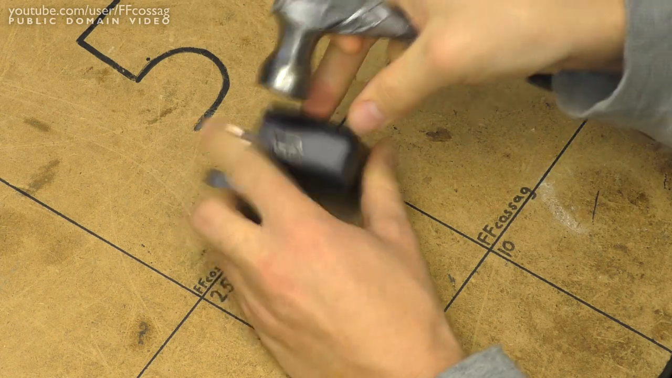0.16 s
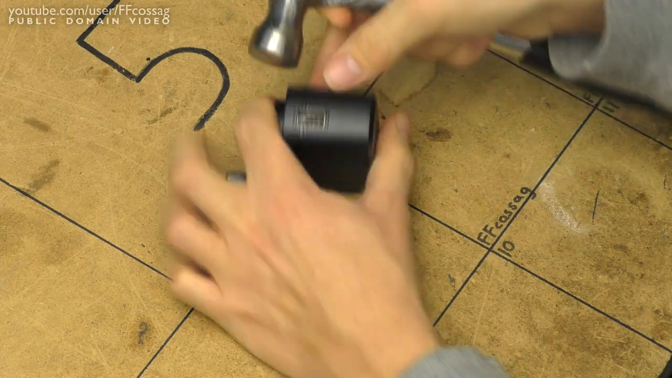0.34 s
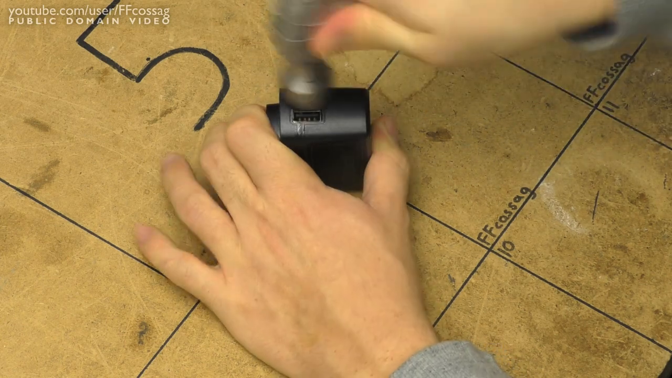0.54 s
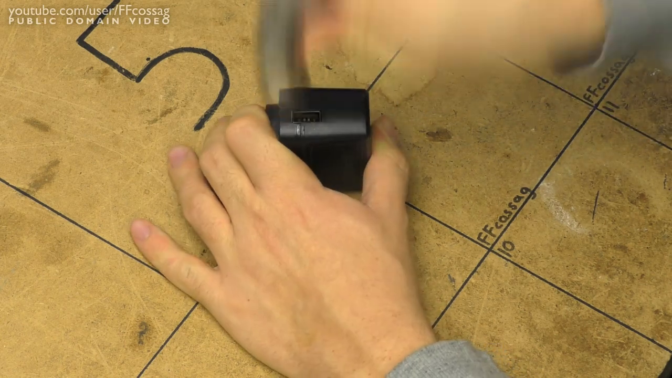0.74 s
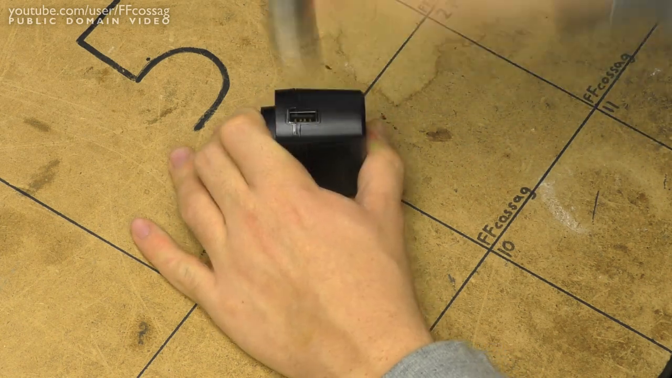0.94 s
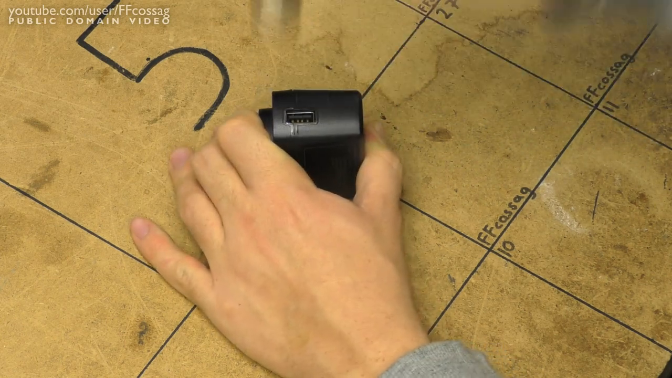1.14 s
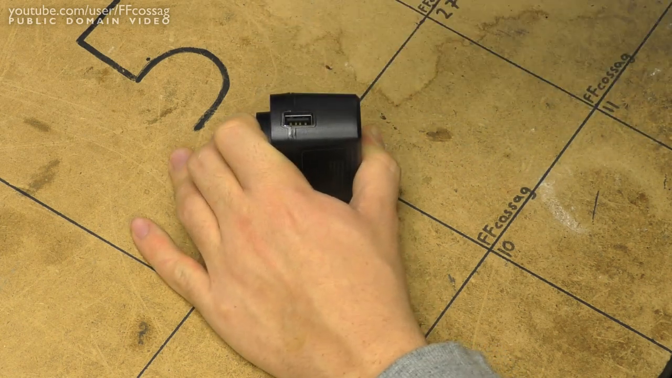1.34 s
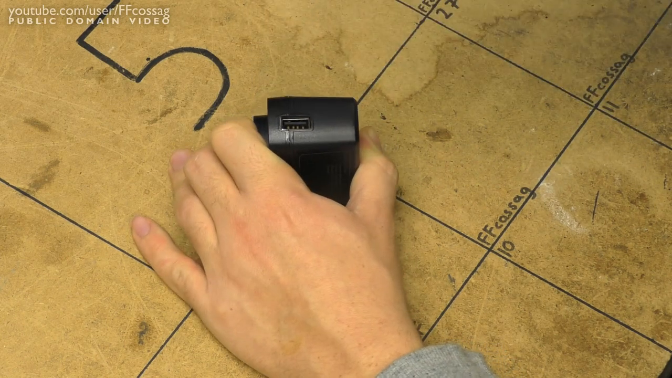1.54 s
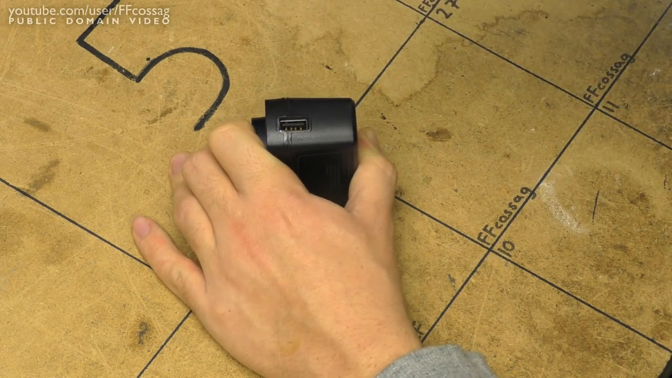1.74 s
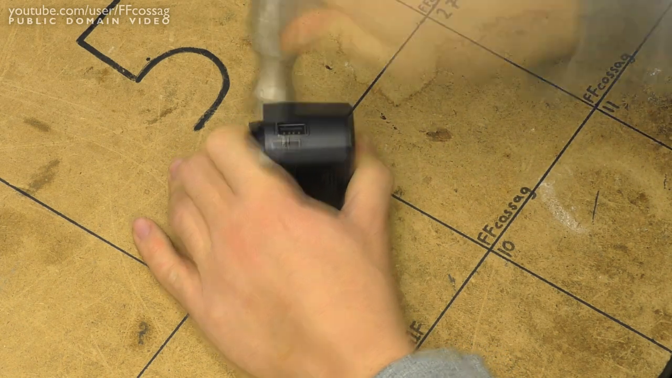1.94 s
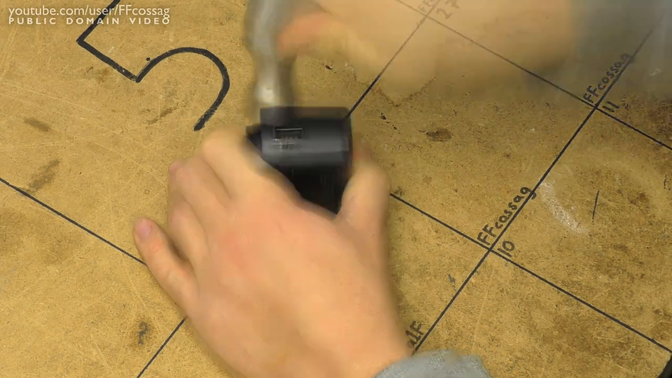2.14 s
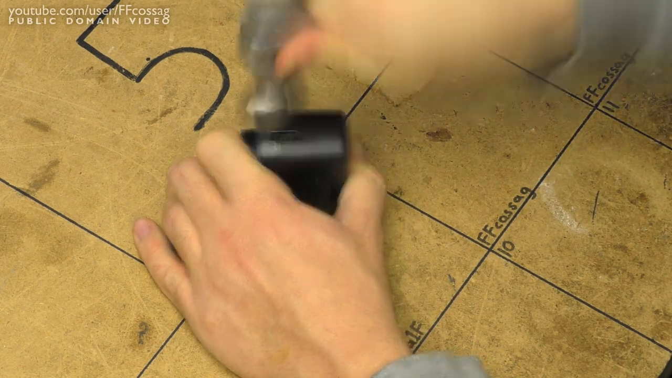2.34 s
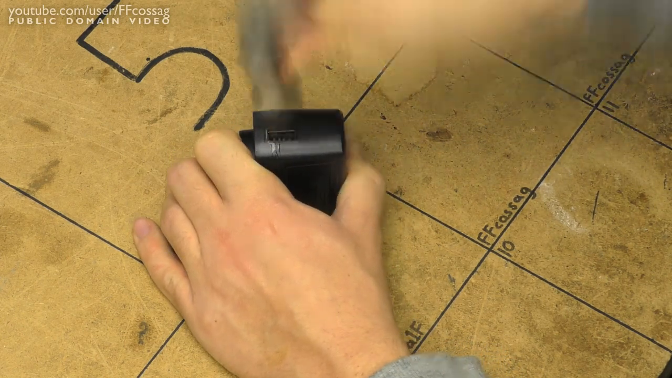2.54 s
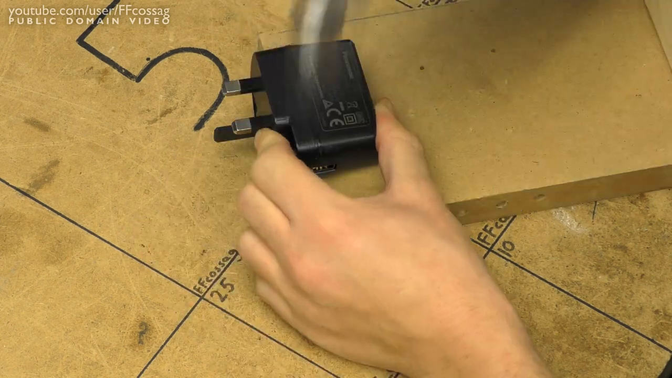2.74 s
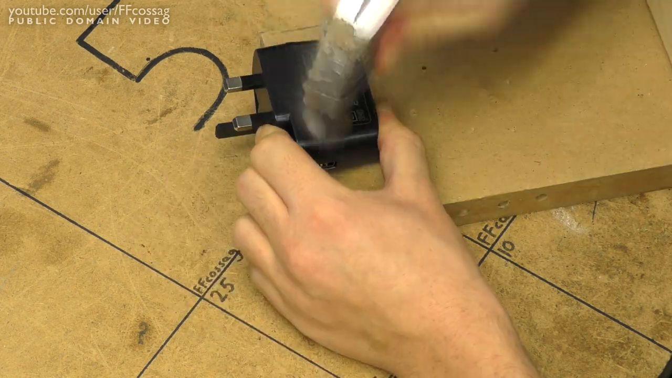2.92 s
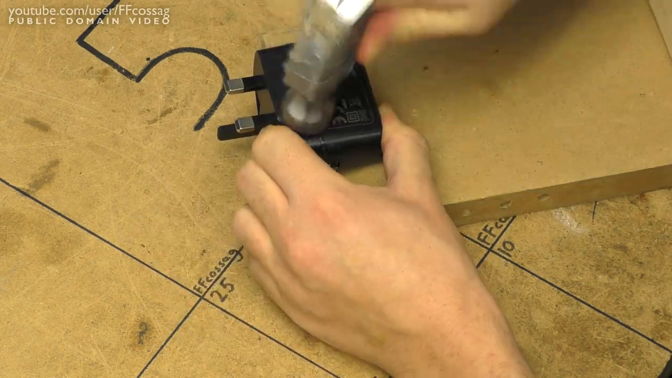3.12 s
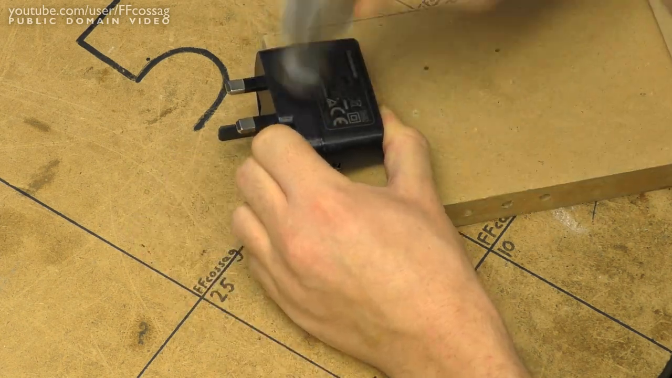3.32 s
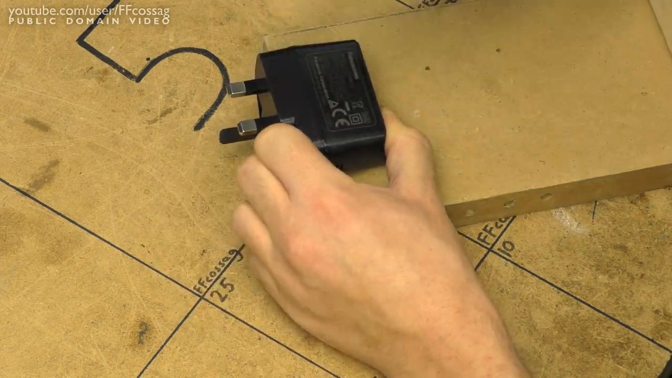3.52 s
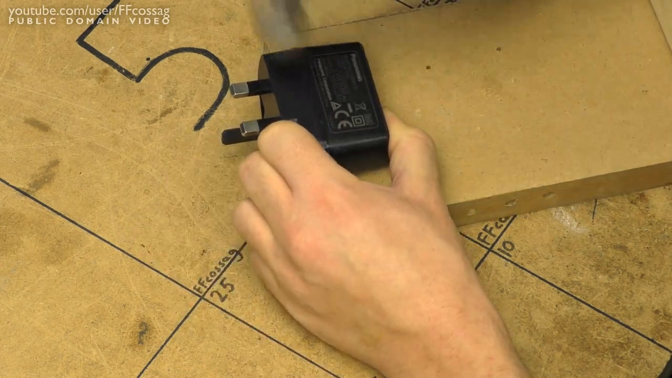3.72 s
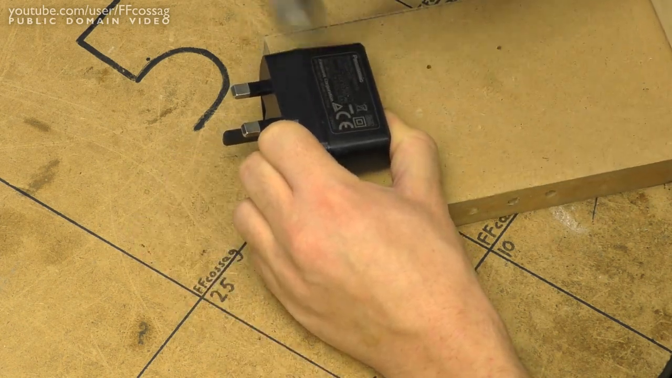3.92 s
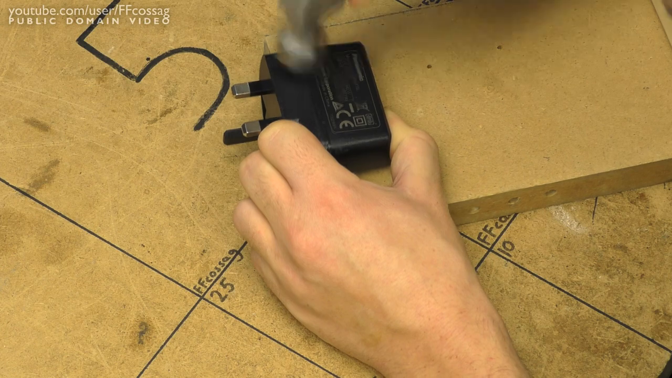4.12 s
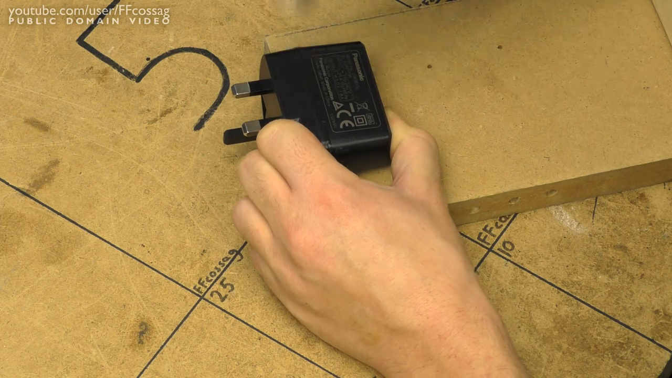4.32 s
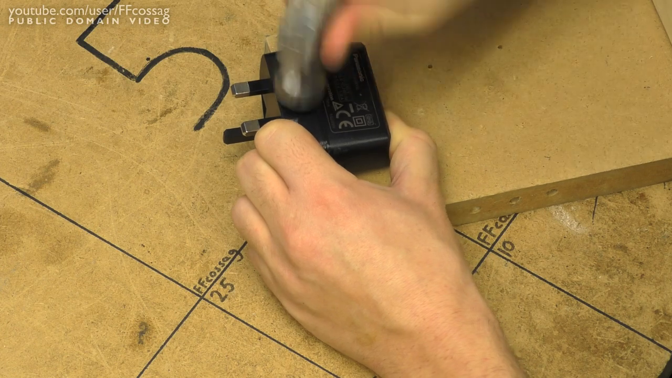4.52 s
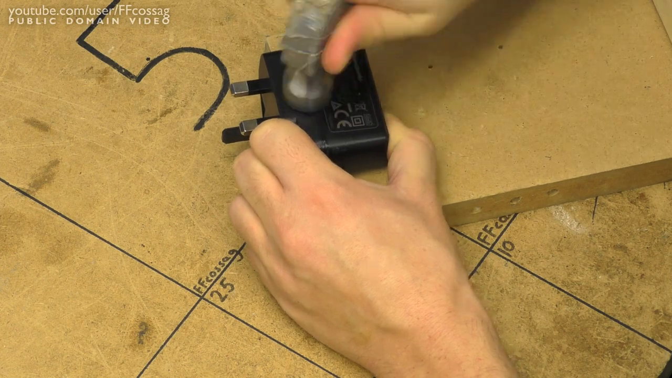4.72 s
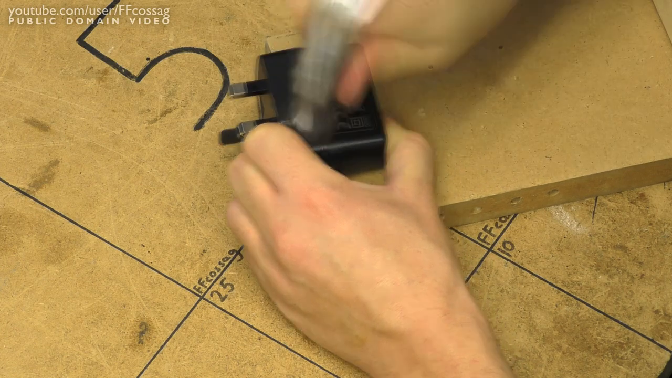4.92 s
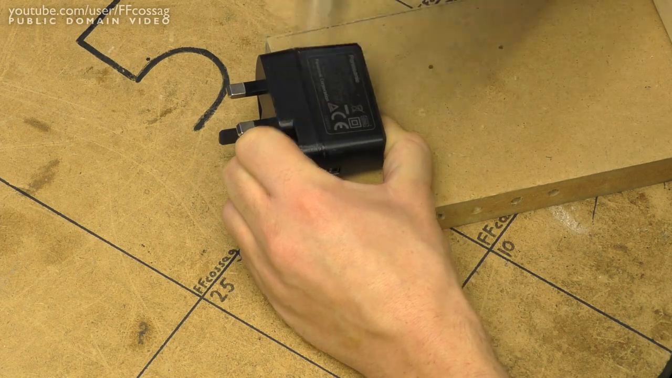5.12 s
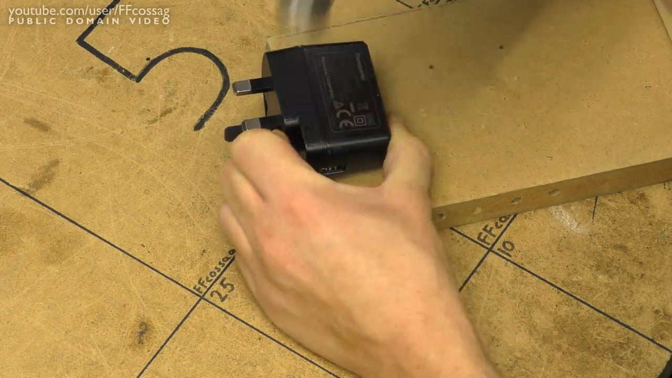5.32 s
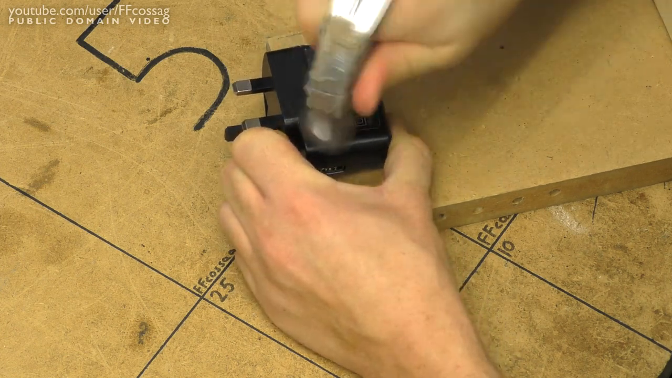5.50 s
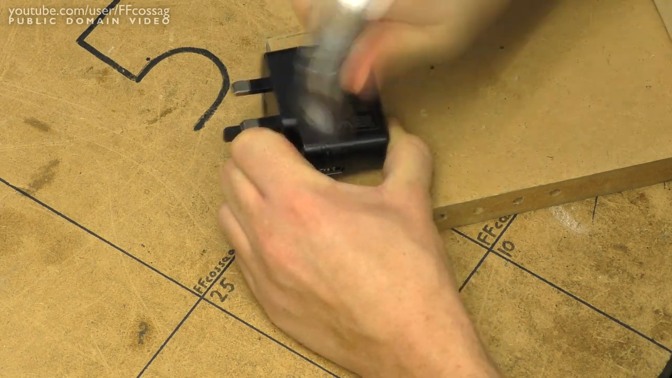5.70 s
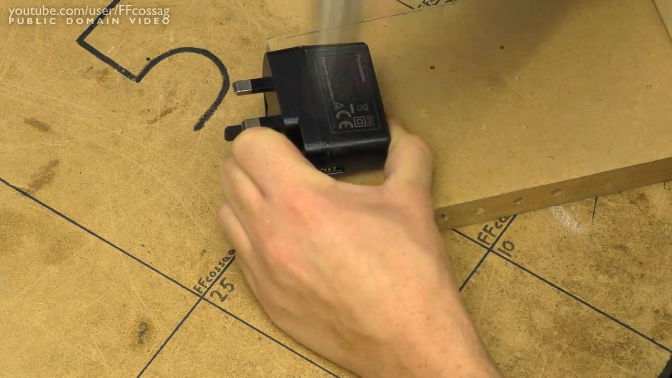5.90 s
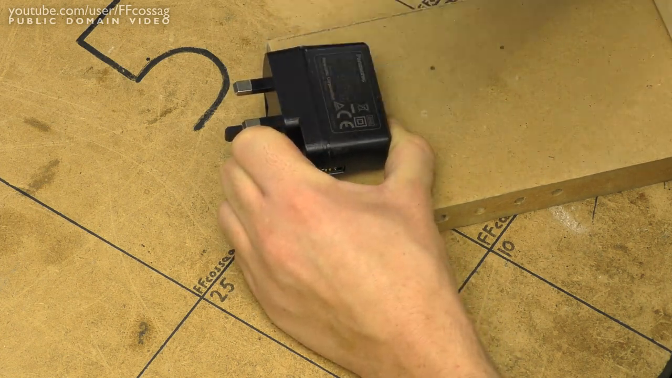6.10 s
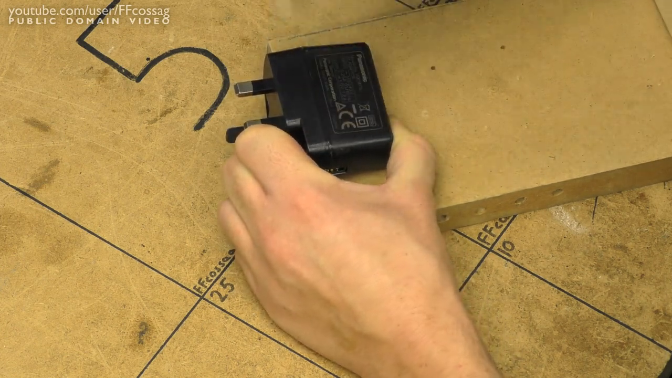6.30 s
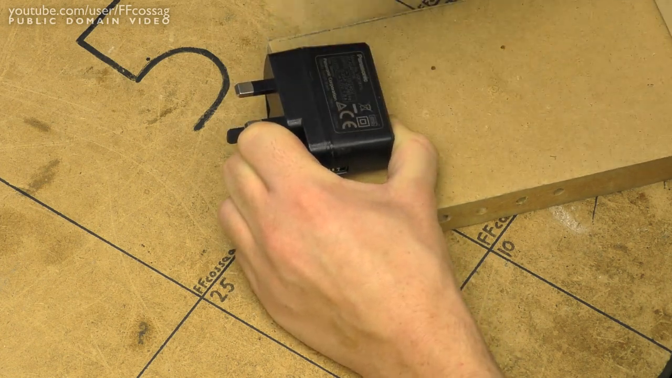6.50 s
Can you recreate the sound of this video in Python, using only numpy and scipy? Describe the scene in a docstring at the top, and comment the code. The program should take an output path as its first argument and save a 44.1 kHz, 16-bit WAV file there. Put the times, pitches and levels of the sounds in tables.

```python
"""A wooden workbench in a small dry room, microphone close to a hard plastic plug adapter. One hammer blow
opens the scene, and the case is stood upright with a hollow clunk. From 0.55 s the hammer raps it about ten
times a second, equally hard: an overloaded crack of the shell, the bench's thump and the room's short answer.
Each blow is heard twice, 16 ms apart, its loudness shared between the copies. From 2.7 s the case lies flat on
a board and chatters after every blow, pins tinkling, at times louder."""
import sys
import numpy as np
from scipy import signal
from scipy.fft import rfft, irfft
from scipy.io import wavfile

SR = 44100
rng = np.random.default_rng(int(sys.argv[2]) if len(sys.argv) > 2 else 0)


def store_wav(level_fs):
    """Save 16-bit WAV to argv[1]."""
    pcm = np.round(np.clip(np.atleast_2d(level_fs), -1, 1) * 32767)
    wavfile.write(sys.argv[1], SR, pcm.T.astype(np.int16))


N = 288855
LAID_FLAT_S, COPY_GAP_S = 2.7, 0.016  # when the case lies flat; gap between a blow's two copies
CHATTER_PEAK_S, CHATTER_SPREAD_S = 0.046, 0.014  # from a blow to its chatter's height; spread around it

# hammer blows: t/s, first copy over the second/dB
BLOWS = [(-0.004, 0), (0.5466, 1.5), (0.6364, -14), (0.7353, 12.5), (0.8282, -4.5), (0.9175, -15.5),
         (1.0156, -15.5), (1.1201, 14), (1.206, -17), (1.314, 9), (1.4056, -12.5), (1.5024, -9.5),
         (1.606, 9), (1.7061, 16), (1.7931, -4.5), (1.8872, -7), (1.9908, 17), (2.0867, 8), (2.175, -20),
         (2.2841, 23), (2.365, -13.5), (2.4597, -14.5), (2.5561, -13), (2.795, -3), (2.9023, -16),
         (3.016, -12), (3.1301, -6), (3.2549, 15), (3.355, -16), (3.4775, 5.5), (3.5933, 13), (3.704, -3.5),
         (3.8303, 17), (3.935, 2.5), (4.0516, 15), (4.1478, -16), (4.405, 12), (4.5157, 9.5), (4.624, -6),
         (4.732, -14), (4.8512, -1.5), (4.9547, -19), (5.0634, -13), (5.1804, -3), (5.2874, -12),
         (5.3967, -21.5), (5.5053, -17.5), (5.6159, -12.5), (5.7396, 21), (5.8413, 8), (5.9509, -7.5),
         (6.0633, -5.5), (6.17, -10), (6.2915, 13), (6.3721, 2), (6.4392, 9), (6.5005, 13.5)]
# colour of the shell, upright and flat: f/Hz, relative level/dB
SHELL_UPRIGHT = [(150, 7), (300, 11.5), (650, -4), (1000, 4.5), (1350, 4.5), (2000, -2), (3000, -7),
                 (4200, -12), (6000, -11.5), (8200, -5), (10500, -19.5), (13500, -17.5), (16000, -32)]
SHELL_FLAT = [(150, 4), (300, 5), (650, -6), (1050, 0.5), (1500, -6.5), (2200, -8.5), (3100, -4),
              (4800, -12.5), (6200, -4.5), (7400, -3.5), (9500, -12.5), (13000, -16.5), (16000, -20)]
# what a blow stirs in each pose, as gains:
# crack/dB, buzz/dB, buzz length/factor, room/dB, bench overtones/dB, hammer ring/dB
POSE_UPRIGHT = (-27, -39, 0.68, -44, 1.5, -6.5)
POSE_FLAT = (-28, -40.5, 0.91, -39.5, -3.5, -16)
# the crack's treble as the hammer wanders over the case: t/s, gain before the overload/dB
CRACK_TREBLE = [(0, -3), (.6, 2), (1.15, -0.5), (2.55, 0.2), (2.8, -6), (3.7, -6), (4.65, -3.5), (5.55, -9),
                (6, -7.5)]
# decay of the buzz, before the pose's length factor: f/Hz, t60/s
BUZZ_T60 = [(300, 0.12), (1500, 0.15), (4000, 0.14), (8000, 0.056), (14000, 0.07)]
# ring of the steel hammer head: f/Hz, relative level/dB, t60/s
HAMMER_MODES = [(7670, -64, .36)]
# modes of the bench top: f/Hz, relative level/dB, t60/s
BENCH_MODES = [(114.1, 6.5, 0.23), (85.5, -10, 0.68), (160.8, -5, 0.45), (244.5, -5, 0.15),
               (297.6, -15, 0.43), (374, -16, 0.19), (446, -27.5, 0.38), (542.5, -14, 0.14),
               (681.4, -18, 0.12), (818, -25, 0.19)]
# how the bench gives under the blows: t/s, relative thump of the top/dB, relative sway on its legs/dB
BENCH_GIVE = [(0.5, -35.5, -44.5), (2.4, -36.5, -44), (3.1, -34, -42), (4.15, -34.5, -48),
              (4.55, -36.5, -34.5), (5.1, -38.5, -37.5), (5.6, -37.5, -40.5), (6.5, -38.5, -44.5)]
# colour of the case chattering on the board: f/Hz, relative level/dB
CHATTER_COLOUR = [(200, -8), (500, -4), (900, -3), (1350, 2), (2050, 4), (2450, -6), (2950, -4),
                  (4000, -15), (6000, -20), (9000, -21), (16000, -42)]
# tinkle of the metal pins: f/Hz, relative level/dB, t60/s
PIN_MODES = [(3740, -26, .18), (6950, -21, .12), (7750, -23, .14), (8700, -22, .12), (10100, -24, .11)]
# louder chatter after some of the flat blows: t/s at its height, level/dB
LOUD_CHATTERS = [(2.98, -46), (3.071, -46), (3.179, -52), (3.303, -51), (3.419, -49), (3.54, -50), (3.638, -50),
                 (3.888, -49), (4.457, -50), (4.671, -50), (4.8, -47), (5.35, -47), (5.461, -48), (5.563, -47),
                 (5.676, -45)]
# clunks as the case is stood on the bench: t/s, relative level/dB
CLUNKS = [(0.1306, -28.5), (0.146, -36)]
# modes of the hollow case: f/Hz, relative level/dB, t60/s
CASE_MODES = [(273, -6, 0.1), (380, 1.5, 0.061), (448, 0, 0.067), (570, -10, 0.057), (725, 2, 0.024),
              (1000, -12, 0.026), (1310, -1.5, 0.021), (1980, -17, 0.032)]
# bumps, ticks and rustles around the blows: t/s, level/dB, rise/s, decay/s, low edge/Hz, high edge/Hz
HANDLING = [(.12, -49.5, 0.011, 0.017, 250, 885), (0.198, -53.5, 0.0058, 0.013, 203, 393),
            (0.27, -67, .003, 0.0074, 600, 2000), (0.374, -70, 0.016, 0.029, 700, 4000),
            (2.751, -60, 0.00011, 0.0017, 400, 5000), (3.6225, -34.5, 0.00034, 0.0036, 250, 2170),
            (4.27, -60.5, 0.00029, 0.015, 900, 4300), (4.333, -55, 0.00029, 0.0015, 1200, 3500),
            (5.91, -42, .008, 0.0098, 900, 4120)]
# colour of the room's answer: f/Hz, relative level/dB
ROOM_COLOUR = [(120, 12), (280, 17.5), (500, 4.5), (800, 7), (1350, 6), (2200, 6.5), (3200, -8.5),
               (4800, -14), (7500, -95.5), (10000, -102), (16000, -106)]
# decay of the room's answer: f/Hz, t60/s
ROOM_T60 = [(150, 0.66), (300, 0.45), (600, 0.23), (1500, 0.14), (4000, 0.14), (8000, 0.059),
            (16000, 0.072)]
# colour of the workshop's room tone: f/Hz, relative level/dB
ROOM_TONE = [(18, -47), (30, -5.5), (118, -4), (153, -11.5), (252, -11.5), (889, -32), (1010, -27.5),
             (2230, -36.5), (7470, -39), (16000, -53.5)]


def hammering(thump_db=6.0, sway_db=8.5, sway_hz=49.2, sway_t60=0.39):
    """Close up, a blow cracks the shell and drives bench, room and hammer head; it is heard twice."""
    mix, common_tail = np.zeros(N), room_answer()
    give_times, thumps, sways = np.transpose(BENCH_GIVE)
    for (s, lead_db), (thump_chance, sway_chance) in zip(BLOWS, rng.standard_normal((len(BLOWS), 2))):
        shell, pose = (SHELL_UPRIGHT, POSE_UPRIGHT) if s < LAID_FLAT_S else (SHELL_FLAT, POSE_FLAT)
        crack_db, buzz_db, buzz_length, room_db, overtone_db, steel_db = pose
        shares = copy_shares(lead_db)
        crack = gain_of(crack_db) * shell_crack(shell, np.interp(s, *np.transpose(CRACK_TREBLE)))
        buzz = gain_of(buzz_db) * short_buzz(shell, buzz_length)
        thump_gain = gain_of(np.interp(s, give_times, thumps) + thump_db + 0.5 * thump_chance)
        thump = thump_gain * bench_thump(overtone_db)
        # the room's answer shifts as the blows land in different places
        tail = gain_of(room_db) * (.5 * common_tail + np.sqrt(3 / 4) * room_answer())
        excess = max(shares[0] - shares[1], 0)  # only a louder first copy has a lead-in
        add(mix, s - COPY_GAP_S, gain_of(crack_db - 15) * excess * lead_in(shell))
        copy_times = (s, s + COPY_GAP_S)
        for at, share, buzz_lift_db, tail_lift_db in zip(copy_times, shares, (2, 0), (-4, 0)):
            add(mix, at, share * crack)
            add(mix, at, share / shares.sum() * thump)
            add(mix, at, gain_of(buzz_lift_db) * np.sqrt(share * shares.max()) * buzz)
            add(mix, at, gain_of(tail_lift_db) * np.sqrt(share) * tail)
        louder_at = s + COPY_GAP_S * (lead_db < 0)
        sway = mode(sway_hz * rng.uniform(0.93, 1.092), sway_t60, rise=0.0056)  # the bench on its legs
        sway_gain = gain_of(np.interp(s, give_times, sways) + sway_db + 1.8 * sway_chance)
        add(mix, louder_at, sway_gain * sway)
        add(mix, louder_at, gain_of(steel_db) * metal_ring(HAMMER_MODES, uneven_db=3.0))
    return mix


def copy_shares(lead_db, power=1.11):
    """A blow's loudness is shared between its two copies: power 1 splits amplitude, 2 splits energy."""
    copies = gain_of([lead_db, 0])
    return copies / np.sum(copies ** power) ** (1 / power)


def shell_crack(shell, treble_db, shelf_hz=4300, body_s=0.0016, treble_s=0.0011, ring_s=0.0083):
    """The shell snaps and rings for a few ms, the treble shortest; the start overloads and flattens."""
    t = clock(2048)
    burst = noise(lambda hz: read(shell, hz) + treble_db / (1 + (shelf_hz / (hz + 1)) ** 4), len(t))
    treble = signal.sosfiltfilt(signal.butter(2, shelf_hz, "high", fs=SR, output="sos"), burst)
    snap = (burst - treble) * np.exp(-t / body_s) + 1.54 * treble * np.exp(-t / treble_s)
    ring = gain_of(-17) * burst * np.exp(-t / ring_s)
    overloaded = np.tanh(2.9 * (snap + ring))
    return overloaded / rms(overloaded[t < .0025])


def short_buzz(shell, length, tilt_db=1.0):
    """A short buzz fills the gap between the two copies and dies away after them."""
    t60s = [(hz, length * t60) for hz, t60 in BUZZ_T60]
    return dying_noise(lambda hz: read(shell, hz) + tilt_db * np.log2(1 + hz / 3000), t60s, size=4096)


def lead_in(shell, swell_s=0.0066, tilt_db=-3.5):
    """A faint rush swells for 16 ms and runs into the crack."""
    t = clock(2048)
    rush = noise(lambda hz: read(shell, hz) + tilt_db * np.log2(1 + hz / 3000), len(t))
    return (rush * np.exp((t - COPY_GAP_S) / swell_s))[t < COPY_GAP_S]


def bench_thump(overtone_db, overtones_above_hz=200, detune=0.029, uneven_db=0.5):
    """The bench top rings a little differently wherever the blow lands."""
    thump, main_hz = 0, BENCH_MODES[0][0]
    for hz, db, t60 in BENCH_MODES:
        strength, pitch, phase = rng.standard_normal(3)
        level_db = db + overtone_db * (hz > overtones_above_hz)
        level_db += uneven_db * strength * (hz != main_hz)
        thump += gain_of(level_db) * mode(hz + detune * main_hz * pitch, t60, 0.0026, phase=.5 * phase)
    return thump


def metal_ring(modes, uneven_db):
    """Struck metal gives thin tones, each with a chance strength."""
    chance = rng.standard_normal((len(modes), 2))
    return sum(gain_of(db + uneven_db * strength) * mode(hz, t60, rise=0.0012, phase=np.pi * phase)
               for (hz, db, t60), (strength, phase) in zip(modes, chance))


def rattling(after_blow_db=-57, uneven_db=0.5):
    """Lying flat, the case chatters softly after every blow, and louder after some."""
    mix = np.zeros(N)
    for s, _ in BLOWS:
        if s > LAID_FLAT_S:
            add(mix, s, gain_of(after_blow_db + uneven_db * rng.standard_normal()) * case_chatter())
    for s, db in LOUD_CHATTERS:
        add(mix, s - CHATTER_PEAK_S, gain_of(db) * case_chatter())
    return mix


def case_chatter(contacts_per_s=320, grain_s=0.003, smear=0.83, pins_at_s=0.022, pins_db=4):
    """A swell of tiny contacts with the board sounds through the hollow case and shakes its pins."""
    t = clock(6144)
    hz = np.fft.rfftfreq(len(t), 1 / SR)
    contacts = (rng.random(len(t)) < contacts_per_s / SR) * (.5 + rng.random(len(t)))
    grains = signal.lfilter([1], [1, -np.exp(-1 / (grain_s * SR))], contacts)
    swell = np.exp(-.5 * ((t - CHATTER_PEAK_S) / CHATTER_SPREAD_S) ** 2)
    force = rng.standard_normal(len(t)) * (smear + grains / rms(grains)) * swell
    chatter = irfft(rfft(force) * gain_of(read(CHATTER_COLOUR, hz)), len(t))
    chatter *= np.sqrt(2) * rms(swell) / rms(chatter)
    add(chatter, pins_at_s, gain_of(pins_db) * metal_ring(PIN_MODES, uneven_db=4))
    return chatter


def set_down(body_db=-5):
    """The hollow case meets the bench and rings briefly."""
    mix = np.zeros(N)
    for s, clunk_db in CLUNKS:
        for hz, db, t60 in CASE_MODES:
            ring = mode(hz, t60, rise=0.00026, phase=rng.uniform(0, 2 * np.pi))
            add(mix, s, gain_of(clunk_db + db + body_db) * ring)
    return mix


def handling(slope_db=17):
    """Handling noise at the bench: soft bumps, ticks and rustles, bands of noise that swell and die."""
    mix, t = np.zeros(N), clock(8192)
    for s, db, rise, decay, low, high in HANDLING:
        envelope = (1 - np.exp(-t / rise)) * np.exp(-t / decay)
        scuff = noise(lambda hz: -slope_db * np.log10(1 + (hz / high) ** 2)
                      - 10 * np.log10(1 + (low / (hz + 1)) ** 4), len(t))
        add(mix, s, gain_of(db) * scuff * envelope / envelope.max())
    return mix


def room_answer(rise_s=0.0014):
    """The small room sends a diffuse tail back to the microphone; its treble dies first."""
    tail = dying_noise(lambda hz: read(ROOM_COLOUR, hz), ROOM_T60, size=16384)
    return tail * (1 - np.exp(-clock(len(tail)) / rise_s))


def room_tone(level_db=-62):
    """The workshop's quiet hum, a steady low noise behind everything."""
    return gain_of(level_db) * noise(lambda hz: read(ROOM_TONE, hz), N)


def mode(hz, t60, rise, phase=0):
    """One dying vibration; t60 and rise in seconds."""
    t = clock(24000)
    return np.cos(2 * np.pi * hz * t + phase) * gain_of(-60 * t / t60) * (1 - np.exp(-t / rise))


def dying_noise(colour, t60s, size):
    """Coloured noise in which each band dies away at its own speed."""
    hz, t, bands = signal.stft(noise(colour, size), SR, nperseg=256)
    t60 = np.maximum(read(t60s, hz), .02)[:, None]
    return signal.istft(bands * gain_of(-60 * t / t60), SR, nperseg=256)[1]


def noise(colour, size):
    """Noise of rms 1; colour maps Hz to dB."""
    hz = np.fft.rfftfreq(size, 1 / SR)
    x = irfft(gain_of(colour(hz)) * np.exp(2j * np.pi * rng.random(len(hz))), size)
    return x / rms(x)


def read(points, hz):
    """A table of f/Hz and value, joined on a log-frequency axis."""
    f, value = np.transpose(points)
    return np.interp(np.log(hz + 1), np.log(f + 1), value)


def add(mix, s, sound):
    """Adds a sound at time s, dropping what falls outside."""
    start = round(s * SR)
    sound = sound[max(-start, 0):]
    part = mix[max(start, 0):][:len(sound)]
    part += sound[:len(part)]


def clock(size):
    """Seconds since an onset, sample by sample."""
    return np.arange(size) / SR


def gain_of(db):
    """Decibels to amplitude."""
    return 10 ** (np.asarray(db) / 20)


def rms(x):
    """Root mean square."""
    return np.sqrt(np.mean(x ** 2) + 1e-20)


def scene():
    """One microphone at the bench: hammering, rattling and handling up close, room tone behind."""
    background = room_tone()
    return (hammering() + rattling() + set_down() + handling() + background)[None]


def record(dry):
    """The recorder's band ends at 16.1 kHz."""
    lowpass = signal.firwin(255, 16100, window=("kaiser", 8), fs=SR)
    return signal.oaconvolve(dry, lowpass[None], "same")


dry = scene()
out = record(dry)
store_wav(out)
```